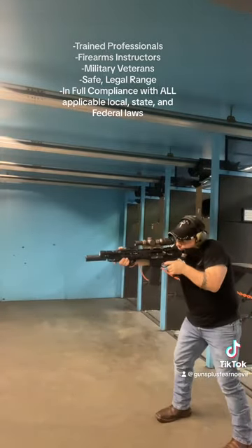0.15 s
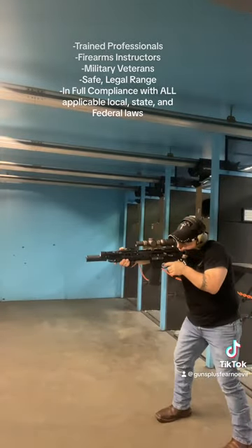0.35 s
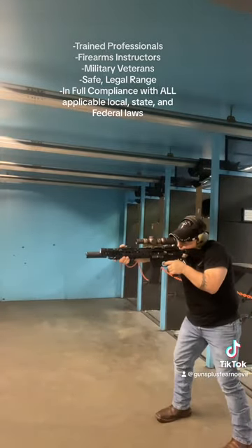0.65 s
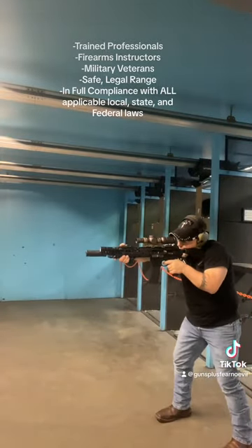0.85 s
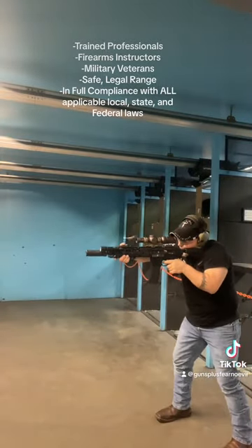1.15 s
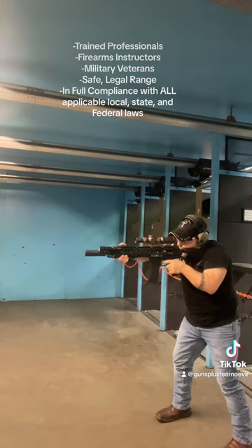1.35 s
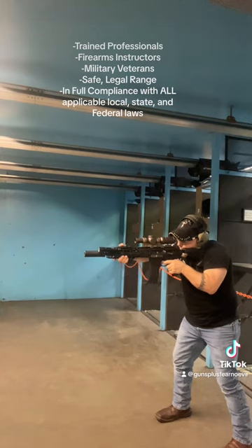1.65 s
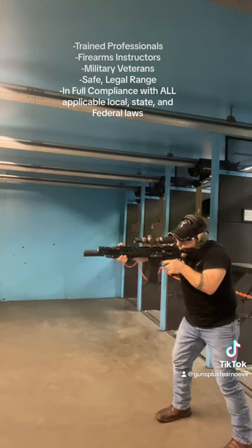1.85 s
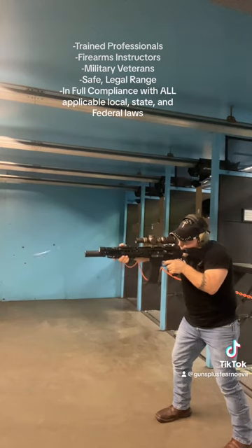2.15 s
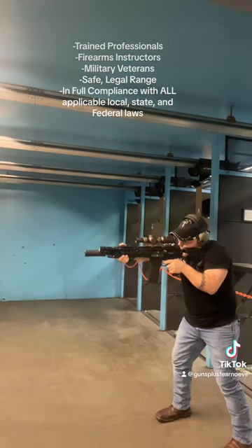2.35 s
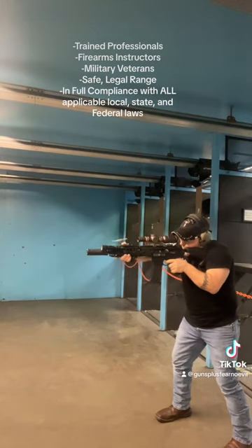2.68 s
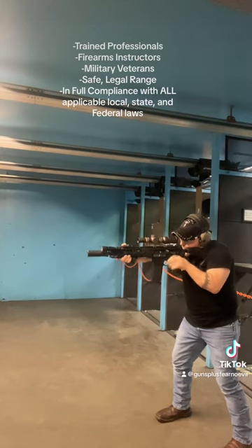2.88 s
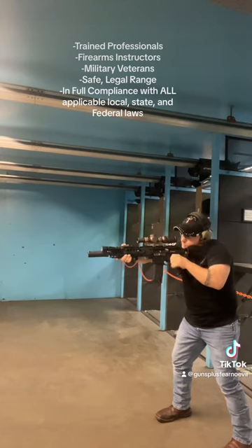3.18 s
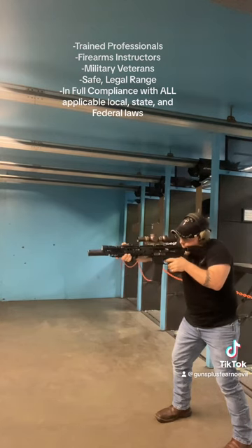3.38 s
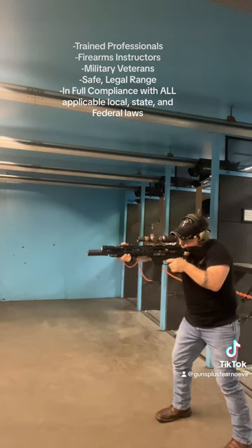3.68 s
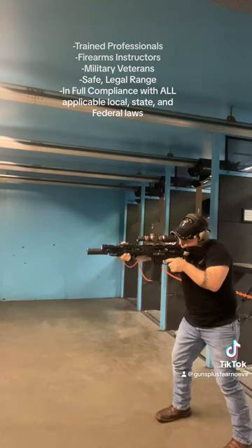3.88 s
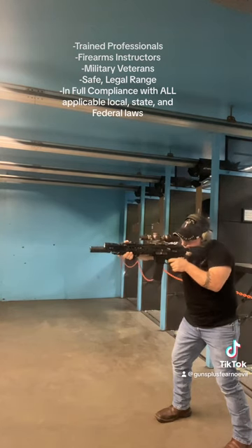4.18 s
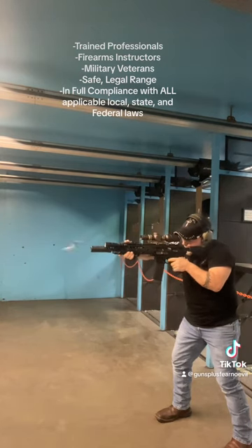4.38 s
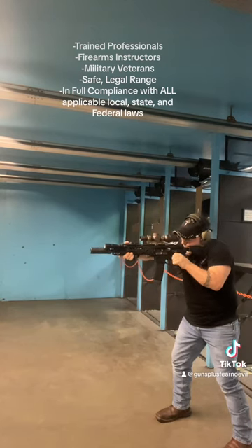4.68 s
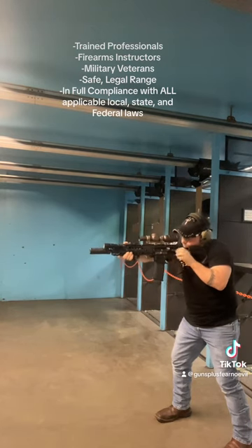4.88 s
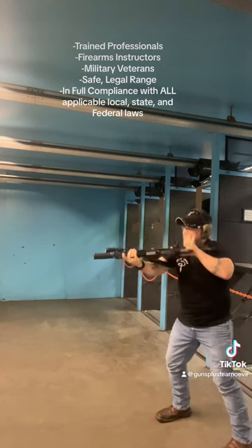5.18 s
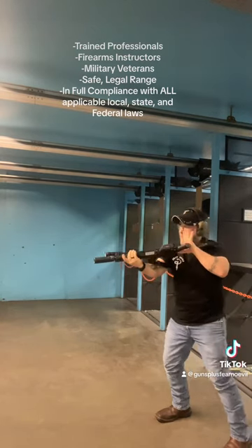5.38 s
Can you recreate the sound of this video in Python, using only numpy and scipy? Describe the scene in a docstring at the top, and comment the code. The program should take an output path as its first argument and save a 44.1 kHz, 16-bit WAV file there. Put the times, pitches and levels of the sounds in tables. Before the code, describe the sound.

Six suppressed rifle shots crack and boom in a hard indoor range, echoes fluttering, while spent brass cases tick and tinkle on the concrete floor.

```python
"""A suppressed rifle fires six shots in a concrete indoor range, the last two as a quick pair.
Each shot is a burst of noise with the same booming room response, a fresh treble tail and a long flutter echo.
Spent cases, built from ticks and clusters of high tones, land and hop on the floor.
Noise and wavering fan tones make the ventilation, which rumbles until the first shot jolts the microphone.
The shots are held down from there and climb back; the rumble stays faint. A bolt rings at the start."""
import sys
import numpy as np
from scipy import signal
from scipy.fft import rfft, irfft
from scipy.io import wavfile
from scipy.ndimage import uniform_filter1d

SR = 44100
rng = np.random.default_rng(int(sys.argv[2]) if len(sys.argv) > 2 else 0)


def master(y):
    """Save y as 16-bit WAV."""
    cut = np.clip(np.atleast_2d(y).T, -1, 1)
    pcm = np.round(cut * 32767)  # scale
    wavfile.write(sys.argv[1], SR, pcm.astype(np.int16))


N = 243736
RESPONSE_SIZE = 81920   # samples in one short sound with its tail
TIME = np.arange(N) / SR   # seconds from the beginning of the scene
AGE = np.arange(RESPONSE_SIZE) / SR   # seconds from the beginning of one short sound


def from_db(db):
    """Turn dB into an amplitude factor."""
    return 10 ** (np.asarray(db) / 20)


def rms_one(x):
    """Scale a sound to an rms level of 1."""
    return x / np.sqrt(np.mean(x ** 2) + 1e-20)


def local_rms(x, size):
    """Level over a sliding window of so many samples."""
    return np.sqrt(np.abs(uniform_filter1d(x ** 2, size)) + 1e-18)


def at_hz(points, hz):
    """Read a table on a logarithmic frequency axis, as pitch is heard."""
    known_hz, values = np.transpose(points)
    return np.interp(np.log(np.maximum(hz, 1)), np.log(known_hz), values)


def fade(t60):
    """Die away exponentially, by 60 dB in t60 seconds."""
    return np.exp(-np.log(1000) * AGE / t60)


def noise(spectrum, size):
    """Noise of a given colour, rms 1: the table shapes the spectrum of white noise."""
    hz = np.fft.rfftfreq(size, 1 / SR)
    white = rfft(rng.standard_normal(size))
    return rms_one(irfft(white * from_db(at_hz(spectrum, hz)), size))


def add(out, s, sound):
    """Mix a sound in from time s in seconds."""
    start = round(s * SR)
    out[start:start + len(sound)] += sound[:N - start]


def waver(rate):
    """Slow random motion: straight lines between random points, so many per second."""
    knots = rng.standard_normal(int(N / SR * rate) + 2)
    return np.interp(TIME * rate, np.arange(len(knots)), knots)


def since_first_shot():
    """Seconds since the first shot, zero before it."""
    return np.maximum(TIME - SHOTS[0][0], 0)


# Colour of the close duct rumble with its rush of air.
# Each row: frequency in Hz, relative level in dB per Hz.
RUMBLE_COLOUR = [(15, -31), (45, 1), (85, -1.5), (108, -3.5), (122, 3), (150, -1.5), (240, -6),
                 (265, -19.5), (470, -19.5), (550, -28), (930, -27.5), (1100, -28.5), (1900, -32),
                 (5500, -49.5), (12000, -58.5), (15500, -66)]
# Colour of the distant wash of air. Each row: frequency in Hz, relative level in dB per Hz.
AIR_COLOUR = [(30, -2), (90, 0), (200, -1), (420, -17), (800, -20), (1200, 5), (2400, -5), (4500, -22),
              (8000, -25.5), (15000, -29.5)]
# Tones of the fan. Each row: middle frequency in Hz, typical level against the rumble in dB.
FAN_TONES = [(96, -6), (191, -6.5), (235, -7)]
# Rumble level before and after the first shot, how fast it sinks, and the distant wash
RUMBLE_DB, RUMBLE_LEFT_DB, RUMBLE_SINK_DB_PER_S, AIR_DB = -42, -82.5, 331.5, -78.5


def ventilation(swell_rate=7.0, wander_hz=2.7, swell_db=2.0):
    """Duct rumble and wavering fan tones; after the first shot little but a distant wash of air is left."""
    rumble = noise(RUMBLE_COLOUR, N)
    for hz, db in FAN_TONES:
        phase = 2 * np.pi * np.cumsum(hz + wander_hz * waver(swell_rate)) / SR
        tone_db = db + swell_db * waver(swell_rate)
        rumble += np.sqrt(2) * from_db(tone_db) * np.sin(phase)   # sqrt(2) gives a sine rms 1
    rumble_db = np.maximum(RUMBLE_DB - RUMBLE_SINK_DB_PER_S * since_first_shot(), RUMBLE_LEFT_DB)
    return from_db(rumble_db) * rumble + from_db(AIR_DB) * noise(AIR_COLOUR, N)


# Colour of the bolt just closed. Each row: frequency in Hz, relative level in dB per Hz.
BOLT_COLOUR = [(400, -13), (1000, -7), (1700, 2.5), (2800, -3.5), (4800, -9), (6500, -14), (8500, -14.5),
               (12000, -19.5), (15500, -32)]
# Resonances of the closing bolt. Each row: frequency in Hz, width in Hz, rise above the colour in dB.
BOLT_RESONANCES = [(1639, 25, 3), (4260, 130, 4.5), (5000, 200, 8), (6250, 170, 5), (7550, 240, 5.5),
                   (8600, 150, 0), (10360, 200, 2), (11220, 150, 3.5)]


def bolt_ring(level_db=-49.0, t60=0.79):
    """The clack of the closing bolt is still dying away in the room: fading noise with resonant peaks."""
    out, hz = np.zeros(N), np.geomspace(100, 16000, num=600)
    colour_db = at_hz(BOLT_COLOUR, hz)
    for centre, width, rise_db in BOLT_RESONANCES:
        colour_db = colour_db + rise_db / (1 + ((hz - centre) / width) ** 2)
    ring = noise(np.column_stack([hz, colour_db]), RESPONSE_SIZE) * fade(t60)
    add(out, 0, from_db(level_db) * ring)
    return out


# Colour of brass touching concrete. Each row: frequency in Hz, relative level in dB per Hz.
TICK_COLOUR = [(2000, -37), (6000, -19), (10000, -11), (13000, -15), (15000, -5), (16500, 0)]
# Ringing tones (modes) of a brass case.
# Each row: frequency in Hz, t60 in seconds, spread of the split partials in Hz.
CASE_MODES = [(10690, 0.8, 100), (11700, .42, 55), (15200, 0.35, 130)]


def case_hit(tick_db, modes_db, tick_t60=0.0089, ping_db=-3.0, ping_t60=.02,
             room_db=-25.0, room_t60=0.41, count=5):
    """The floor ticks, the rim pings and the brass rings; spinning splits each mode into a shimmering cluster."""
    tick = noise(TICK_COLOUR, RESPONSE_SIZE) * (fade(tick_t60) + from_db(room_db) * fade(room_t60))
    ping = from_db(ping_db) * fade(ping_t60) * np.sin(2 * np.pi * CASE_MODES[-1][0] * AGE)
    sound = from_db(tick_db) * (tick + ping)
    for (hz, t60, spread_hz), db in zip(CASE_MODES, modes_db):
        partials_hz = hz + spread_hz * rng.standard_normal((count, 1))
        start_turns = rng.random((count, 1))
        cluster = np.sin(2 * np.pi * (partials_hz * AGE + start_turns)).sum(axis=0)
        sound += from_db(db) * fade(t60) * cluster / np.sqrt(count)
    return sound


# Spent cases landing.
# Each row: start in seconds, tick level in dB, then the levels of the three case modes in dB.
LANDINGS = [(1.68, -70, -83, -81, -58), (2.359, -60, -74, -87, -65), (3.185, -39, -78, -62, -54.5),
            (3.587, -61.5, -85, -93.5, -67), (4.524, -34, -86, -82, -47), (4.724, -39, -90.5, -65.5, -76),
            (4.819, -39, -60.5, -80, -60.5), (4.953, -52, -89.5, -76, -54.5), (5.252, -52.5, -77, -91, -62)]
# Typical strength of the case modes in a first hop: one level in dB for each mode.
HOP_MODES_DB = [-82.5, -90, -72]
# Tick of the first hop, time to it, how each next wait shrinks, and the loss on each later hop
HOP_TICK_DB, HOP_S, HOP_SHRINKS, HOP_LOSS_DB = -63.5, 0.14, .8, 3


def cases(unevenness=.12, scatter_db=1.0, count=2):
    """Each case lands, then hops on, mostly sooner and fainter, striking its modes with new strengths."""
    out = np.zeros(N)
    for s, tick_db, *modes_db in LANDINGS:
        add(out, s, case_hit(tick_db, modes_db))
        for hop in range(count):
            s += HOP_S * HOP_SHRINKS ** hop * np.exp(unevenness * rng.standard_normal())
            strengths_db = np.array(HOP_MODES_DB) + scatter_db * rng.standard_normal(len(CASE_MODES))
            sound = case_hit(HOP_TICK_DB, strengths_db)
            if s < TIME[-1]:
                add(out, s, from_db(-HOP_LOSS_DB * hop) * sound)
    return out


def trigger(level_db=-62.5, t60=.07, lead_s=.029):
    """A tiny steel click, a fading noise burst, as the trigger breaks for the first shot."""
    out = np.zeros(N)
    colour = [(2000, -15), (6300, -2), (8500, -4), (11500, 0.5), (15500, -12)]   # Hz, relative dB
    click = noise(colour, RESPONSE_SIZE) * fade(t60)
    add(out, SHOTS[0][0] - lead_s, from_db(level_db) * click)
    return out


# Colour of the snap on the pressure front of the first shot.
# Each row: frequency in Hz, relative level in dB per Hz.
SNAP_COLOUR = [(500, -12), (1500, -5), (3000, -2.5), (5500, -1.5), (8000, -7.5), (13000, -3.5),
               (16000, -15)]


def first_jolt(thump_db=-10.5, crack_db=-10.5, snap_db=-13.5, crack_s=.00007, knee_s=0.00066,
               turns=0.99, sag=0.76, thump_t60=0.3, snap_t60=0.007):
    """The first shot hits undimmed: a brief fizz, a steep pressure front, and a thump that falls in pitch."""
    out, stretch = np.zeros(N), 1 + AGE / knee_s
    lead_s, fizz_db = .0075, -30.5
    # the logarithm makes each swing of the thump longer than the last
    thump = np.cos(2 * np.pi * turns * np.log(stretch)) * stretch ** -sag * fade(thump_t60)
    front = from_db(crack_db) * np.exp(-AGE / crack_s)
    snap = from_db(snap_db) * noise(SNAP_COLOUR, RESPONSE_SIZE) * fade(snap_t60)
    fizz = noise([(1000, 0.5), (4000, -8.0), (13000, 2.5)], RESPONSE_SIZE)   # Hz, relative dB
    fizz = fizz * np.sqrt(AGE / lead_s) * (AGE < lead_s)   # grows until the front arrives
    add(out, SHOTS[0][0], from_db(thump_db) * thump + front + snap)
    add(out, SHOTS[0][0] - lead_s, from_db(fizz_db) * fizz)
    return out


# Colour of the flutter echo trapped between the side walls.
# Each row: frequency in Hz, relative level in dB per Hz.
FLUTTER_COLOUR = [(60, -18), (200, 0), (280, -3), (400, -6.5), (570, -15.5), (850, -4), (980, -0.5),
                  (1400, -5.5), (1800, -7.5), (2400, -21), (3100, -15), (4000, -27), (9000, -44)]
ROUND_TRIP_S = .063   # from wall to wall and back


def flutter_echo(level_db=-49.5, t60=3.42, scatter=0.48, build_s=0.063):
    """The same packet of sound passes twice on each round trip, mixed with some plain scattered hiss."""
    packet = np.resize(noise(FLUTTER_COLOUR, round(ROUND_TRIP_S * SR)), N)   # repeats
    echo = rms_one(packet + scatter * noise(FLUTTER_COLOUR, N))
    passing = 1 + .45 * np.cos(4 * np.pi * TIME / ROUND_TRIP_S)
    build_up = 1 - np.exp(-TIME / build_s)
    decay = np.exp(-np.log(1000) * TIME / t60)
    return from_db(level_db) * echo * passing * build_up * decay


# Colour of a shot's reverberation.
# Each row: frequency in Hz, starting level in dB per Hz before the room and shot adjustments.
REVERB_COLOUR = [(35, -85.5), (70, -64), (105, -53), (160, -53), (310, -47.5), (420, -54), (600, -51.5),
                 (1000, -52), (1500, -57.5), (2100, -66.5), (3000, -66.5), (4200, -68), (7500, -68.5),
                 (11000, -63.5), (15500, -73)]
# How long the range rings. Each row: frequency in Hz, t60 in seconds.
RANGE_T60 = [(60, 1.0), (200, 0.75), (450, 1.13), (750, 1.17), (1200, 0.94), (2500, 1.08), (5000, 0.94),
             (10000, 0.58), (15000, 0.4)]


def diffuse_tail(low_hz, high_hz, count):
    """Dense reflections between two frequencies: bands of steady noise, each dying at the room's rate."""
    white = rfft(rng.standard_normal(RESPONSE_SIZE))
    hz = np.fft.rfftfreq(RESPONSE_SIZE, 1 / SR)
    edges, out = np.geomspace(low_hz, high_hz, count + 1), 0
    for low, high in zip(edges, edges[1:]):
        centre = np.sqrt(low * high)
        band = irfft(white * ((hz >= low) & (hz < high)))
        steady = band / local_rms(band, size=1500)
        gain = np.sqrt(high - low) * from_db(at_hz(REVERB_COLOUR, centre))   # dB per Hz over the band
        out = out + steady * gain * fade(at_hz(RANGE_T60, centre))
    return out


# First returns from the walls. Each row: delay in seconds, width in seconds, rise in dB.
FIRST_RETURNS = [(.038, .012, 4.5), (.066, .0055, 4.5), (.091, .007, 5)]
RANGE_TRIP_S = .087   # they come round again after each trip along the range
RETURN_KEEPS, RETURN_WIDENS = .78, 1.06   # factors for the rise in dB and the width on each trip


def wall_returns(count=6):
    """Swell in dB from the wall returns, repeating weaker and more blurred on every trip along the range."""
    swell_db = 0
    for delay, width, db in FIRST_RETURNS:
        for trip in range(count):
            distance = (AGE - delay - trip * RANGE_TRIP_S) / (width * RETURN_WIDENS ** trip)
            swell_db = swell_db + db * RETURN_KEEPS ** trip * np.exp(-.5 * distance ** 2)
    return swell_db


# Standing waves of the range. Each row: frequency in Hz, relative level in dB, t60 in seconds.
STANDING_WAVES = [(69.8, -31, .6), (116.2, -40, 1.1), (162.2, -32, 1.2), (236.6, -39, 1.7),
                  (306.4, -28.5, 1.45), (347.5, -28, 0.97), (440.2, -32, 1.3), (485, -32, 1.3),
                  (497.6, -32.5, 1.2), (565.5, -26, 1.55), (574, -29.5, 1.5), (586, -33, 1.35),
                  (652, -46, 1.2), (718.4, -43, 2.5), (710, -36.5, 0.62), (739, -42.5, 1.9),
                  (795, -38.5, 1.8), (820, -38.5, 0.79), (876, -38.5, 0.71), (925, -47.5, 0.63),
                  (945, -39, 1.1), (1028, -40, 1.6), (1148, -40, .9), (1198, -31.5, 1.6),
                  (1343, -37.5, 1.4), (1507, -39.5, .9)]


def room_boom(first_db=1.0, build_s=0.022, between_db=-5.0, modes_db=-4.5, settle_s=0.018):
    """The low response: dense reflections settle into standing waves and swell with each return."""
    boom = diffuse_tail(30, 1900, count=18)
    standing = 0
    for hz, db, t60 in STANDING_WAVES:
        wave = np.sin(2 * np.pi * (hz * AGE + rng.random()))
        standing = standing + from_db(db + modes_db) * fade(t60) * wave
    boom = boom + standing * (1 - np.exp(-AGE / settle_s))
    # the energy drains evenly between returns: swap the quick level changes for slow ones
    boom = boom * local_rms(boom, size=5000) / local_rms(boom, size=500)
    return boom * from_db(between_db + wall_returns() + first_db * np.exp(-AGE / build_s))


# Colour of the gas jet from the suppressor and the ejection port.
# Each row: frequency in Hz, relative level in dB per Hz.
BLAST_COLOUR = [(100, -3), (300, 3.5), (900, 8), (2000, 4), (3500, 3), (6500, -1.5), (11000, 2),
                (13500, -2.5), (16000, -23.5)]


def gas_blast(length_s=0.06, release_s=.008, direct_db=3.5, direct_s=0.0051):
    """Turbulent gas as noise: the direct crack, then a short flat burst of its nearest reflections."""
    burst = .5 * (1 - np.tanh((AGE - length_s) / release_s))
    direct_gain = from_db(direct_db * np.exp(-AGE / direct_s))
    return noise(BLAST_COLOUR, RESPONSE_SIZE) * burst * direct_gain


# The six shots. Each row: start in seconds, change of boom and flutter in dB,
# change of the treble reverberation in dB, gain of the gas blast in dB.
SHOTS = [(0.9974, 2.5, 1.9, -50), (1.4224, -1, -1.5, -24), (1.9122, -2.4, -1.5, -30.5),
         (2.5139, -.5, 0.4, -29), (3.9482, 1, 1.8, -25), (4.128, 1.63, 2, -30)]
# The level of the shots dips at the first one and climbs back steadily
DIP_DB, RECOVERY_DB_PER_S = 12.5, 13


def rifle(first_db=-3.5, build_s=0.017):
    """Every shot excites the same boom and flutter, with a fresh gas blast and a fresh treble tail."""
    out, boom, flutter = np.zeros(N), room_boom(), flutter_echo()
    for s, boom_db, treble_db, blast_db in SHOTS:
        treble = diffuse_tail(1900, 16500, count=20)
        treble = treble * from_db(treble_db + first_db * np.exp(-AGE / build_s))
        add(out, s, from_db(boom_db) * boom + treble + from_db(blast_db) * gas_blast())
        add(out, s, from_db(boom_db) * flutter)
    return out * from_db(np.minimum(RECOVERY_DB_PER_S * since_first_shot() - DIP_DB, 0))


def scene():
    """All sources add up at one microphone."""
    return (ventilation() + bolt_ring() + cases() + trigger() + first_jolt() + rifle())[None]


CUTOFF_HZ = 15900


def record(dry, top=0.94):
    """Peaks are rounded smoothly and the treble above the cutoff is removed."""
    # order 10, ripple of .2 dB below the cutoff, at least 70 dB down in the stopband
    lowpass = signal.ellip(10, .2, 70, CUTOFF_HZ, fs=SR, output="sos")
    return signal.sosfilt(lowpass, top * np.tanh(dry / top))


dry = scene()
out = record(dry)
master(out)
```